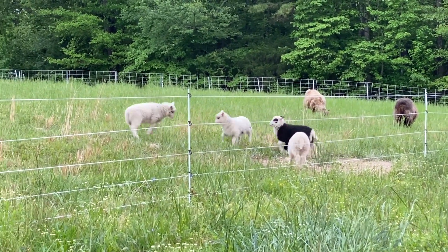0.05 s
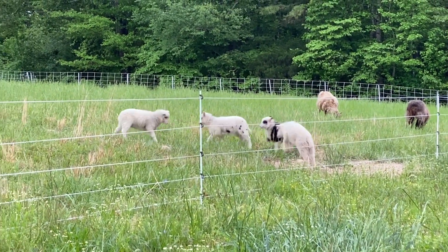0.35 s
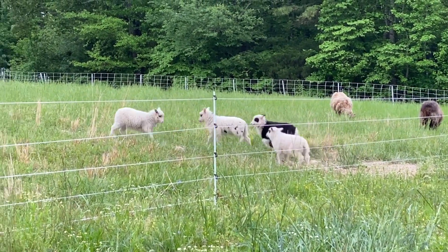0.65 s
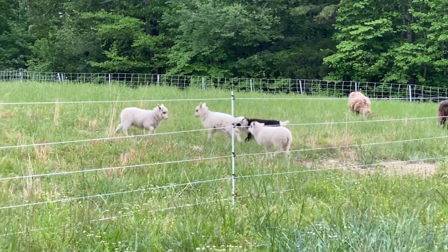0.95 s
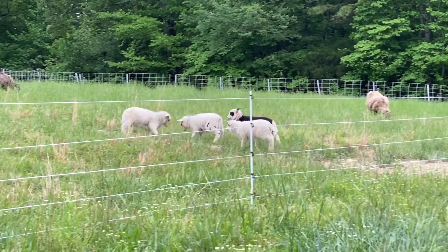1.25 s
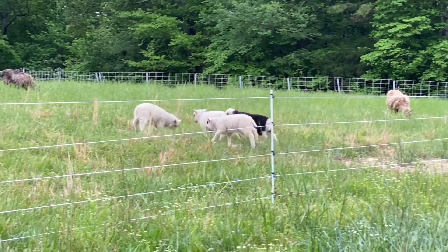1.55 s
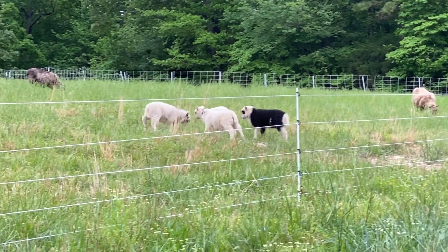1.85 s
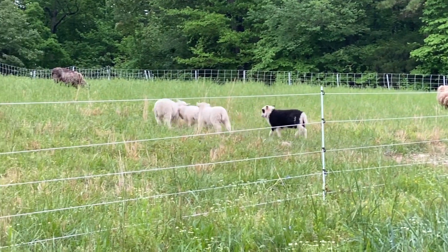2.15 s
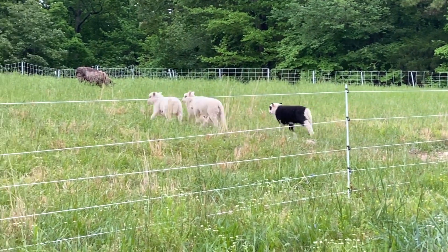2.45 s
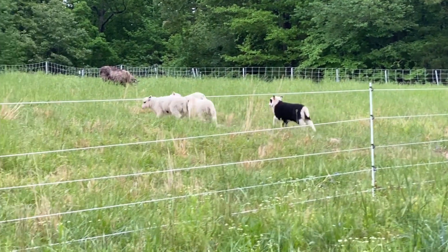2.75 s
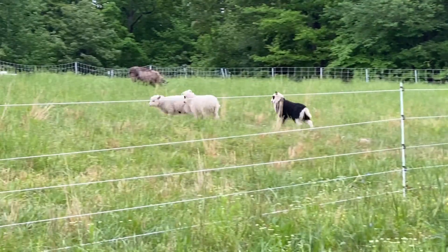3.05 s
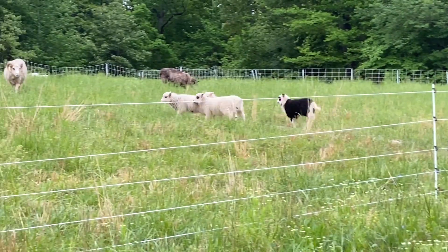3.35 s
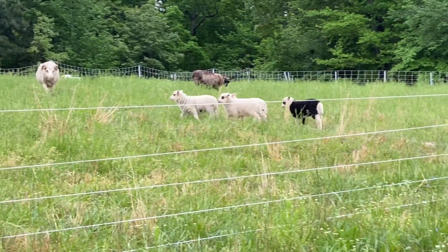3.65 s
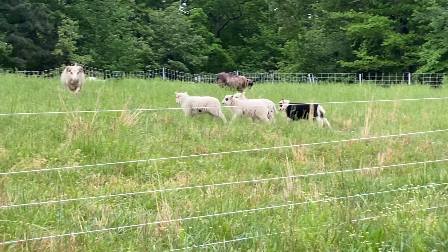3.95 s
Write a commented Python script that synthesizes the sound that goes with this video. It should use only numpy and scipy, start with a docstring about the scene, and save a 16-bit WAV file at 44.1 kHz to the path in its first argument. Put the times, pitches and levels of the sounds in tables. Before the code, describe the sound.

One brief lamb bleat in a quiet field with low wind and faint birdsong.

```python
"""Lamb in a pasture.

A lamb ends a loud, clear bleat, vocal pulses ringing its throat; the tree line returns a faint echo.
Far engines drone under low wind on the microphone, grass rustles and ticks close by,
and a distant bird whistles once, then repeats a three-note phrase."""
import sys
import numpy as np
from scipy import signal
from scipy.fft import rfft, irfft
from scipy.io import wavfile
from scipy.ndimage import uniform_filter1d

SR = 44100
rng = np.random.default_rng(int(sys.argv[2]) if len(sys.argv) > 2 else 0)


def to_wav(sig):
    """Store sig (one row per channel, or 1-D mono) as 16-bit WAV at the path in sys.argv[1].

    Samples outside -1..1 are clipped; the rate is SR.
    """
    pcm = np.clip(np.atleast_2d(sig), -1, 1) * 32767
    pcm = np.round(pcm).astype(np.int16)
    wavfile.write(sys.argv[1], SR, pcm.T)  # frames by channels


N = 176400
T = np.arange(N) / SR
HZ = np.fft.rfftfreq(N, 1 / SR)
CUTOFF_HZ = 15600


def amp(db):
    """Decibels to gain."""
    return 10 ** (np.asarray(db) / 20)


def unit(x):
    """Scales to rms 1."""
    return x / np.sqrt(np.mean(x ** 2) + 1e-20)


def read(points, hz):
    """Interpolates on a log-frequency axis."""
    f, value = np.transpose(points)
    return np.interp(np.log(hz + 1), np.log(f + 1), value)


def curve(points):
    """Interpolates over time."""
    return np.interp(T, *np.transpose(points))


def add(mix, start_s, sound):
    """Mixes a sound in."""
    part = mix[max(round(start_s * SR), 0):][:len(sound)]
    part += sound[:len(part)]


def colour(x, points):
    """Minimum-phase filter from (Hz, dB) rows."""
    log_gain = np.log(amp(read(points, abs(np.fft.fftfreq(4096, 1 / SR)))))
    taps = np.fft.ifft(np.exp(np.conj(signal.hilbert(log_gain)))).real
    return signal.oaconvolve(x, taps[:len(taps) // 2])[:N]


def wander(hz):
    """Random drift of rms 1, rolling off above hz."""
    rolloff = np.exp(-np.minimum(HZ / hz, 10) ** 2)
    return unit(irfft(rfft(rng.standard_normal(N)) * rolloff, N))


def swells(rows):
    """Gaussian bumps of gain from (centre s, length s, dB) rows."""
    return sum(amp(db) * np.exp(-np.minimum(abs(2 * (T - s) / length), 10) ** 2)
               for s, length, db in rows)


def pan_gains(balance, hz):
    """Left and right gains from a balance spectrum."""
    left_db = read(balance, hz) / 2
    return amp([left_db, -left_db])


# Each row: time in seconds, pitch in Hz.
BLEAT_PITCH_HZ = [(0, 311.3), (.045, 309.6), (.08, 305.4), (.108, 299.7), (.168, 298.2), (.23, 289.6),
                  (.28, 274), (.298, 256), (.316, 208)]
# Each row: time in seconds, drive to the throat in dB.
BLEAT_EFFORT_DB = [(0, -31.5), (.1, -34), (.2, -33.5), (.25, -35), (.28, -37), (.3, -37.5), (.313, -45.5),
                   (.321, -53.5)]
# Each row: frequency in Hz, throat gain in dB.
THROAT_DB = [(150, -13.5), (300, -9.5), (600, -11), (900, -9), (1250, -1.5), (1550, -13), (2100, -5.5),
             (2450, -2), (2720, 5), (3050, -7.5), (3800, -4.5), (4450, 3.5), (5200, 2.5), (6000, -1.5),
             (7900, -7.5), (9900, -6.5), (10500, -20.5), (12200, -24), (14000, -22), (15500, -29.5)]
# Each row: time in seconds, mouth resonance in Hz.
MOUTH_HZ = [(0, 1150), (.12, 1174), (.25, 1140), (.32, 1122)]


def lamb():
    """Vocal pulses ring the throat; the voice sags, dulls and turns rough as the mouth shuts."""
    rough_from_s, end_s = .29, BLEAT_EFFORT_DB[-1][0]
    rough = np.clip((T - rough_from_s) / (end_s - rough_from_s), 0, 1)
    jitter, rasp_db, fizz_db = .0004 + .011 * rough, -50 + 36 * rough, -9
    hz = curve(BLEAT_PITCH_HZ)
    turns = np.cumsum(hz * (1 + jitter * wander(400))) / SR
    folds = unit(sum(np.cos(2 * np.pi * k * turns) * (k * hz < CUTOFF_HZ) for k in range(1, 64)))
    puffs = unit((.4 + np.exp(-(turns % 1) / .3)) * rng.standard_normal(N))
    fizz = signal.lfilter(*signal.butter(4, 7000, "high", fs=SR), puffs)
    drive = folds + amp(fizz_db) * fizz + amp(rasp_db) * puffs
    drive = drive * amp(curve(BLEAT_EFFORT_DB)) * (T < end_s)
    # The top overtones go first.
    soft = signal.filtfilt(*signal.butter(4, 8900, fs=SR), drive)
    top_db = -170 * np.maximum(T - .25, 0)
    drive = soft + (drive - soft) * amp(top_db)
    # The treble fades and wavers from pulse to pulse.
    low = signal.filtfilt(*signal.butter(2, 1300, fs=SR), drive)
    treble_db = -3 * rough ** 2 - 10 * T + .76 * wander(150)
    throat = colour(low + (drive - low) * amp(treble_db), THROAT_DB)
    return throat + amp(25.5) * resonate(throat, curve(MOUTH_HZ), width_hz=101)


def resonate(x, hz, width_hz):
    """A unity-gain resonance with a moving centre."""
    carrier = np.exp(2j * np.pi * np.cumsum(hz) / SR)
    pole = np.exp(-np.pi * width_hz / SR)
    return 2 * (carrier * signal.lfilter([1 - pole], [1, -pole], x / carrier + 1e-18)).real


def ground_scatter(x, level_db=-15, decay_s=.012):
    """The ground scatters the treble, smearing each pulse."""
    t = T[:SR // 20]
    taps = rng.standard_normal(len(t)) * np.exp(-t / decay_s)
    treble = signal.lfilter(*signal.butter(4, 4500, "high", fs=SR), x)
    return x + amp(level_db) * signal.oaconvolve(treble, taps / np.linalg.norm(taps))[:N]


# Each row: frequency in Hz, left over right in dB.
VOICE_PAN_DB = [(350, -1), (700, 3), (1250, 2.5), (2400, 0)]
# Each row: frequency in Hz, left phase lead in radians.
VOICE_LEAD_RAD = [(600, .5), (1350, .75), (1800, -1), (2800, .5), (5500, .2)]


def place_voice(x):
    """The voice reaches the two microphones at different levels and phases."""
    lead = read(VOICE_LEAD_RAD, HZ) / 2
    impulses = irfft(pan_gains(VOICE_PAN_DB, HZ) * np.exp(1j * np.array([lead, -lead])), N)
    taps = np.roll(impulses, 256, 1)[:, :513] * np.hanning(513)
    return signal.oaconvolve(np.array([x, x]), taps, "same", axes=1)


# Each row: frequency in Hz, gain into the echo in dB.
ECHO_SEND_DB = [(300, -38.5), (1200, -40.5), (2200, -37), (2750, -27), (5000, -30), (15000, -59)]
# Each row: frequency in Hz, seconds to decay 60 dB.
ECHO_T60_S = [(300, 1.1), (2700, 1.1), (5000, 0.65), (12000, 0.92)]


def tree_echo(x, return_s=.35, spread_s=.075, return_db=6):
    """A diffuse echo with a scattered return from the edge of the wood."""
    hz, frame_s, spectra = signal.stft(rng.standard_normal((2, SR)), SR, nperseg=256)
    decay = amp(-60 * frame_s / read(ECHO_T60_S, hz)[:, None])
    tails = signal.istft(spectra * decay, SR)[1]
    t = T[:tails.shape[1]]
    tails *= np.sqrt(np.minimum(t / return_s, 1))  # open ground returns little at first
    tails *= amp(return_db * np.exp(-((t - return_s) / spread_s) ** 2))
    tails /= np.linalg.norm(tails[0])
    return signal.fftconvolve(colour(x, ECHO_SEND_DB)[None], tails, axes=1)[:, :N]


# Each row: frequency in Hz, then level in dB at start, middle and end, before the swell.
ENGINE_LINES = [(55, -51.5, -51.5, -56.5), (84.4, -51.5, -56, -54.5), (107.9, -60, -53.5, -56.5),
                (139.9, -54, -60.5, -61), (169.7, -67.5, -68, -70), (221.8, -65, -66, -76.5)]
# Each row: time in seconds, gain of all lines in dB.
ENGINE_SWELL_DB = [(1, -1), (1.5, -2.5), (2.6, 1.5), (3.3, -4), (3.75, 1.5)]


def engines(waver_db=1.5, drift=.004):
    """Far engines hum in low, wavering tones."""
    out = np.zeros(N)
    for hz, *levels in ENGINE_LINES:
        level_db = np.interp(T, np.linspace(0, T[-1], len(levels)), levels) + waver_db * wander(2.1)
        turns = np.cumsum(hz * (1 + drift * wander(2.5))) / SR + rng.random()
        out += amp(level_db) * unit(np.sin(2 * np.pi * turns))
    return out * amp(curve(ENGINE_SWELL_DB))


# Each row: frequency in Hz, relative noise density in dB.
AIR_SPECTRUM_DB = [(15, -40), (35, -10), (55, -3.5), (110, -5.5), (170, -15), (270, -19), (500, -22),
                   (800, -25.5), (1050, -34), (2000, -35.5), (2500, -43.5), (3100, -51.5), (3750, -51),
                   (4200, -45.5), (4750, -56), (7500, -57.5), (15000, -64)]
# Each row: frequency in Hz, left-right correlation.
AIR_CORRELATION = [(130, 0.92), (290, 0.34), (640, -0.54), (1410, 0.25), (3100, 0.91), (15000, 0.56)]
# Each row: frequency in Hz, left over right in dB.
AIR_PAN_DB = [(60, 0), (110, -7.5), (200, 1.5), (380, -4), (700, -3.5), (1290, 0.5), (2380, 2.5),
              (4390, -.5)]


def air(level_db=-51.5, fall_db_per_s=.8, patch_db=1.5, fft_size=1024):
    """Rumble and leaf hiss of the open field, in drifting patches."""
    hz = np.fft.rfftfreq(fft_size, 1 / SR)
    draws = rng.standard_normal((2 * N // fft_size + 4, len(hz), 5)).T
    left, independent = draws[0] + 1j * draws[1], draws[2] + 1j * draws[3]
    patches = unit(uniform_filter1d(uniform_filter1d(draws[4], size=10, axis=0), size=8, axis=1))
    correlation = np.clip(read(AIR_CORRELATION, hz), -1, 1)[:, None]
    right = correlation * left + np.sqrt(1 - correlation ** 2) * independent
    gain = amp(read(AIR_SPECTRUM_DB, hz)[:, None] + patch_db * patches)
    spectra = np.array([left, right]) * gain * pan_gains(AIR_PAN_DB, hz)[:, :, None]
    return amp(level_db - fall_db_per_s * T) * unit(signal.istft(spectra)[1][:, :N])


# Each row: centre in seconds, length in seconds, level in dB.
WIND_BUFFETS = [(.19, 0.094, -50), (.43, 0.059, -45.5), (.8, 0.033, -47.5), (.93, 0.075, -44)]
# Each row: frequency in Hz, relative noise density in dB.
WIND_SPECTRUM_DB = [(20, -19), (60, 8.5), (150, -21), (400, -53)]


def wind():
    """Low buffets on the microphone, each a few even swings of pressure."""
    rumble = colour(rng.standard_normal(N), WIND_SPECTRUM_DB)
    swings = np.cos(np.angle(signal.hilbert(rumble)))
    return unit(signal.filtfilt(*signal.butter(2, 140, fs=SR), swings)) * swells(WIND_BUFFETS)


# Each row: centre in seconds, envelope peak in dB.
WIND_THUMPS = [(.325, -34), (0.659, -37.5), (.94, -37.5), (1.051, -34.5)]


def thumps(length_s=.029, hz=62.5):
    """Sharper buffets: one push and pull of pressure each."""
    return sum(swells([(s, length_s, db)]) * np.sin(2 * np.pi * hz * (s - T)) for s, db in WIND_THUMPS)


# Each row: centre in seconds, length in seconds, level in dB.
GRASS_RUSTLES = [(.442, 0.037, -73.5), (.49, .09, -80.5), (1.06, 0.11, -77.5), (1.27, 0.17, -81.5),
                 (1.46, 0.14, -81), (1.67, 0.086, -84), (2.335, 0.087, -66), (3.29, .05, -83.5),
                 (3.51, 0.046, -84), (3.98, 0.083, -84.5)]
# Each row: frequency in Hz, relative noise density in dB.
GRASS_SPECTRUM_DB = [(1000, -22), (3500, -11.5), (6000, -3.5), (11000, -4.5), (14300, 2), (15500, 2.5)]


def grass(snaps_per_s=2400, spread_db=4.5, clump_db=3, stir_db=-94.5):
    """Brushed stalks give clumps of tiny snaps over a constant faint stir."""
    sizes = amp(spread_db * np.minimum(rng.exponential(1, N), 4)) * rng.standard_normal(N)
    snaps = sizes * (rng.random(N) < snaps_per_s / SR)
    clumps = colour(snaps, GRASS_SPECTRUM_DB) * amp(clump_db * wander(60))
    return unit(clumps) * (swells(GRASS_RUSTLES) + amp(stir_db))


# Each row: start in seconds, level in dB, band centre in Hz.
DRY_TICKS = [(0.5602, -51, 5370), (2.291, -67, 8000), (3.082, -66, 7360), (3.602, -59, 12700),
             (3.692, -63, 8500)]


def ticks(decay_s=.0012, width_octaves=.73):
    """Close, dry ticks: fast-decaying bursts of band noise."""
    out, t = np.zeros(N), T[:SR // 20]
    hz = np.fft.rfftfreq(len(t), 1 / SR) + 1
    for start_s, db, centre_hz in DRY_TICKS:
        band = np.exp(-.5 * (np.log2(hz / centre_hz) / width_octaves) ** 2)
        burst = irfft(rfft(rng.standard_normal(len(t))) * band, len(t))
        add(out, start_s, amp(db) * unit(burst) * np.exp(-t / decay_s))
    return out


def whistle(length_s, path_hz, db, jitter):
    """One unsteady tone on a curved glide, loudest past its middle."""
    progress = np.arange(0, length_s, 1 / SR) / length_s
    glide = np.polyval(np.polyfit([0, .5, 1], path_hz, 2), progress)
    hz = glide * (1 + jitter * wander(250)[:len(progress)])
    return amp(db) * np.sin(np.pi * progress ** 1.4) * np.sin(2 * np.pi * np.cumsum(hz) / SR)


# Start and length in seconds, (first, middle, last) pitch in Hz, level in dB, relative jitter.
LONE_WHISTLE = (1.81, .1, (2230, 2300, 2330), -75, .008)
# Each row: start in seconds, first note's level in dB, later notes' level in dB, pitch factor.
BIRD_PHRASES = [(3.19, -71, -76, 1.05), (3.52, -72, -72, 1), (3.828, -70, -69.5, 1)]
# Each row: offset and length in seconds, first, middle and last pitch in Hz, gain in dB, relative jitter.
PHRASE_NOTES = [(0, .072, 1530, 1660, 1850, 0, .006), (.072, .05, 3480, 3530, 3470, -9, .02),
                (.112, .048, 2950, 2280, 2100, 0, .02)]


def bird():
    """A lone whistle, then phrases of a rising note, a rough high note and a falling slur."""
    out = np.zeros(N)
    add(out, LONE_WHISTLE[0], whistle(*LONE_WHISTLE[1:]))
    for start_s, first_db, later_db, pitch in BIRD_PHRASES:
        for note, phrase_db in zip(PHRASE_NOTES, (first_db, later_db, later_db)):
            offset_s, length_s, *path_hz, db, jitter = note
            sound = whistle(length_s, pitch * np.array(path_hz), phrase_db + db, jitter)
            add(out, start_s + offset_s, sound)
    return out


def bump(start_s=2.7545, level_db=-48.5, hz=603, decay_s=.0033):
    """One soft, close bump: a damped tone."""
    out, t = np.zeros(N), T[:SR // 20]
    add(out, start_s, amp(level_db) * np.sin(2 * np.pi * hz * t) * np.exp(-t / decay_s))
    return out


def scene():
    """The lamb, the bird and the field around them."""
    voice, song = lamb(), bird()
    near = wind() + thumps() + ticks() + bump() + grass()
    wide_grass = amp(-6.5) * np.array([grass(), grass()])
    direct = place_voice(ground_scatter(voice)) + song
    echo = tree_echo(voice + amp(28) * song)
    return direct + echo + engines() + air() + near + wide_grass


def record(dry, lag_s=.00028, lag_above_hz=6800, low_cut_hz=36):
    """The left channel lags in the top treble; low cut and band limit."""
    phase = np.pi * lag_s * np.maximum(np.fft.rfftfreq(2 * N, 1 / SR) - lag_above_hz, 0)
    pair = irfft(rfft(dry, 2 * N) * np.exp(1j * np.array([-phase, phase])), 2 * N)[:, :N]
    pair = signal.sosfilt(signal.butter(5, low_cut_hz, "high", fs=SR, output="sos"), pair)
    lowpass = signal.firwin(511, CUTOFF_HZ, window=("kaiser", 9), fs=SR)
    return signal.oaconvolve(pair, lowpass[None], "same")


dry = scene()
out = record(dry)
to_wav(out)
```